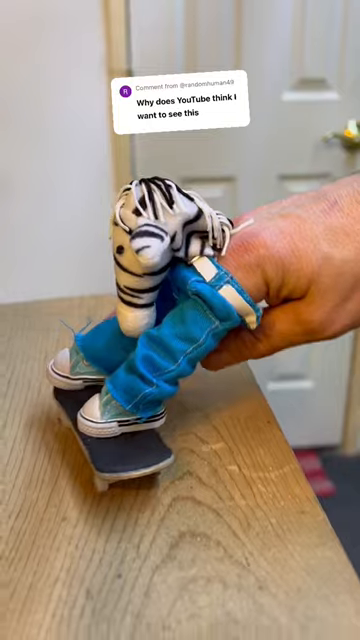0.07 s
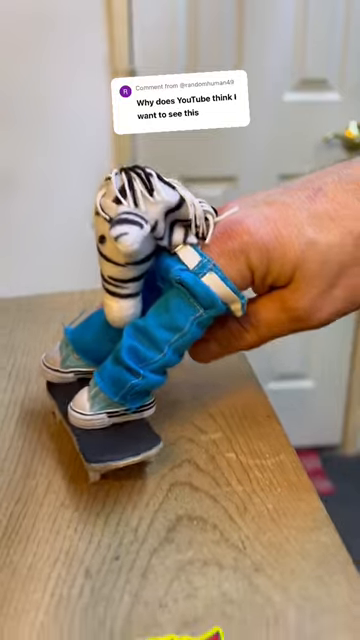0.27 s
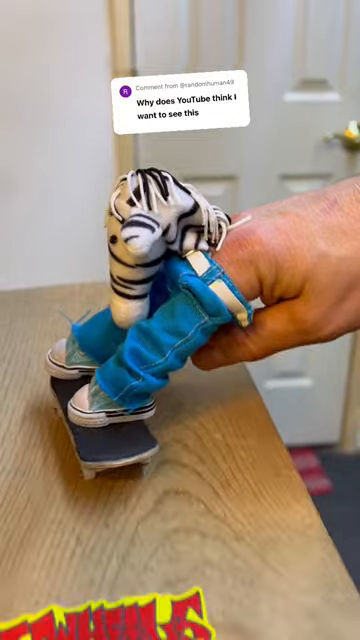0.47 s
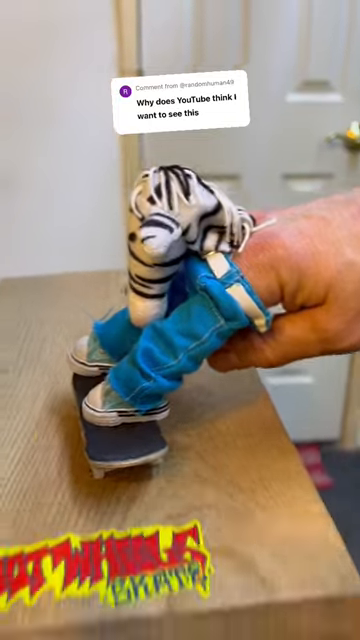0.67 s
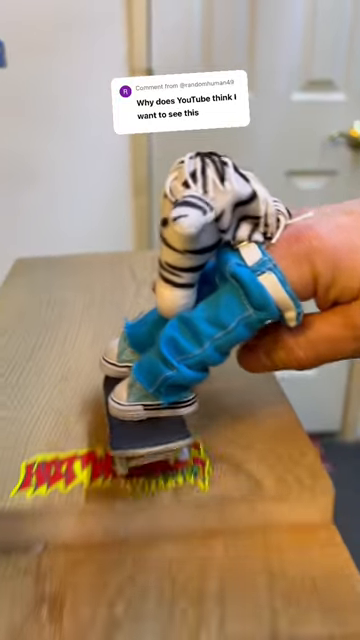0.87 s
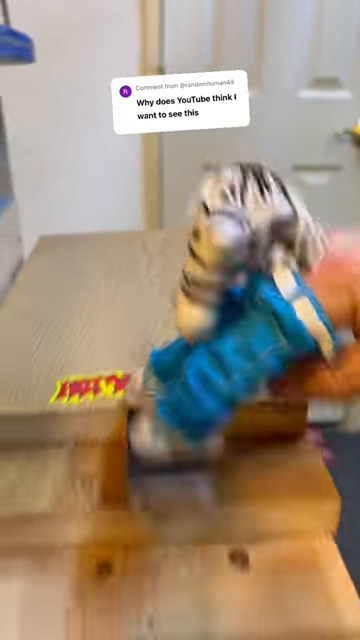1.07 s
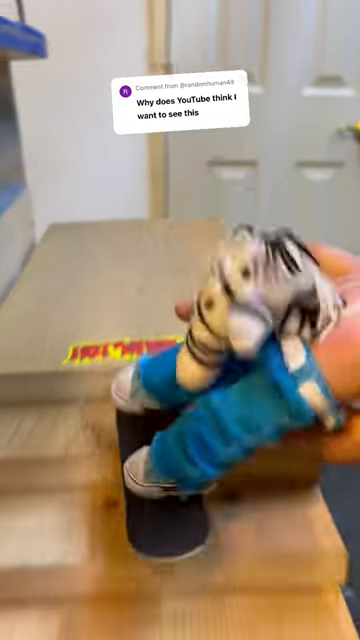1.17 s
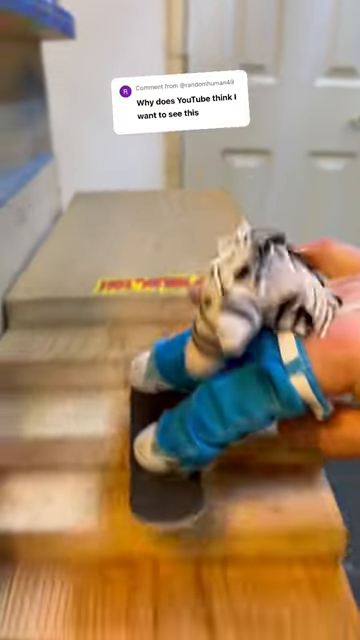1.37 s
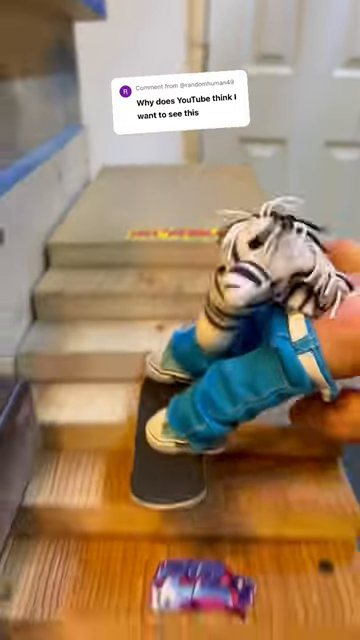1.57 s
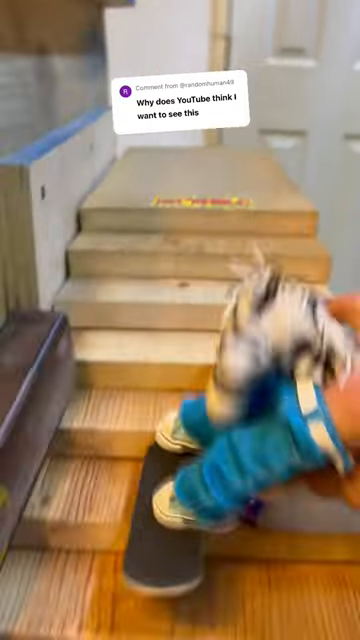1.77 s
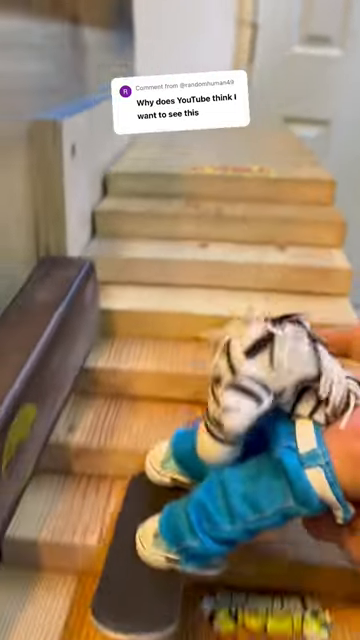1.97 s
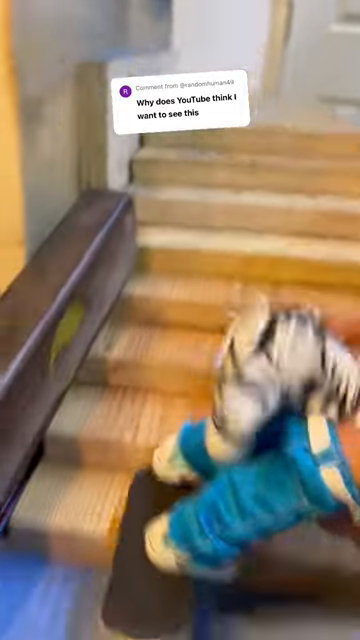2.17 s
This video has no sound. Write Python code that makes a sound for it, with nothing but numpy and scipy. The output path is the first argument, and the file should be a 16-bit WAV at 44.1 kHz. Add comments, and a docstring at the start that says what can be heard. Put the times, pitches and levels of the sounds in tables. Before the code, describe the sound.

A fingerboard rolls across wood with light ticks and a whirr, then clacks quickly down little wooden steps, ending in a low thump. It is heard up close in a small room with a faint fan hum.

```python
"""A fan hums in a small room; a hand bumps softly on a wooden platform and a fingerboard rolls off.
Its wheels tick and start to whirr, then it clacks down a flight of little steps. Each axle lands
with a burst of chatter from wheels and deck; the tread knocks and the whole staircase thumps,
and the bottom board booms last. Heard from close by, through a phone's two microphone ports."""
import sys
import numpy as np
from scipy import signal
from scipy.fft import rfft, irfft
from scipy.io import wavfile
from scipy.ndimage import uniform_filter1d

SR = 44100
rng = np.random.default_rng(int(sys.argv[2]) if len(sys.argv) > 2 else 0)


def unload_wav(signal):
    """Save mono or channel-first audio to the path in sys.argv[1] as 16-bit WAV at rate SR, clipped to [-1, 1]."""
    wavfile.write(
        sys.argv[1],
        SR,
        np.round(np.clip(np.atleast_2d(signal).T, -1, 1) * 32767).astype(np.int16),
    )


N = 98298
T = np.arange(N) / SR
HIT_T = T[:SR // 3]  # time within one impact


def undb(db):
    """Decibels to gain."""
    return 10 ** (np.asarray(db) / 20)


def unit(x):
    """Scale to an rms of one."""
    return x / np.sqrt(np.mean(x ** 2))


def blow(x, db, span_s=0.005):
    """Give a blow the energy of span_s seconds at this level."""
    return x * undb(db) * np.sqrt(span_s * SR / np.sum(x ** 2))


def rise(time_s):
    """Onset of a vibration building up after a blow."""
    return 1 - np.exp(-HIT_T / time_s)


def decay(t60_s):
    """Free decay, 60 dB down after t60_s."""
    return np.exp(-np.log(1000) * HIT_T / t60_s)


def curve(points, hz):
    """Read (freq_hz, value) points on a log axis."""
    freqs, values = np.array(points, float).T
    return np.interp(np.log(hz + 1), np.log(freqs), values)


def colour(x, spectrum, rings_hz=(), ring_db=5.5, ring_width=0.092, size=2048):
    """Minimum-phase filter with the given spectrum and added resonances."""
    hz = np.arange(size // 2 + 1) * SR / size
    peaks_db = sum(ring_db / (1 + ((hz / f - 1) / ring_width) ** 2) for f in rings_hz)
    cepstrum = irfft(np.log(undb(curve(spectrum, hz) + peaks_db)))
    cepstrum[1:size // 2] *= 2
    cepstrum[size // 2 + 1:] = 0
    return signal.fftconvolve(x, irfft(np.exp(rfft(cepstrum))))[:len(x)]


def band(x, low_hz, high_hz):
    """Band-pass."""
    return signal.sosfilt(signal.butter(3, [low_hz, high_hz], "band", fs=SR, output="sos"), x)


def ring(modes, jitter=0.):
    """Damped modes whose signs change with the point of contact; jitter scatters their pitch."""
    chance = rng.standard_normal((len(modes), 2))
    return sum(np.sign(side) * undb(db) * np.sin(2 * np.pi * hz * (1 + jitter * detune) * HIT_T)
               * decay(t60) for (hz, t60, db), (detune, side) in zip(modes, chance))


def add(out, start_s, x):
    """Mix a sound in at its time."""
    i = int(start_s * SR)
    out[i:i + len(x)] += x[:max(N - i, 0)]


# Air from the fan, behind everything: freq_hz, level_db
FAN_SPECTRUM = [(25, -32), (45, -13.5), (70, -10.5), (120, -3.5), (170, 0), (260, -1), (420, 1.5),
                (600, -4), (1000, -18), (2000, -21.5), (4000, -28), (9000, -38), (12000, -45), (16000, -63)]
# Its motor: pitch_hz, level_db
MOTOR_HUM = [(120, -57.5), (240.5, -49)]


def fan(air_db=-42.5, side_db=-14, start_s=0.0348):
    """Steady rush of air with a motor hum, near the centre of the stereo image."""
    spectrum = undb(curve(FAN_SPECTRUM, np.fft.rfftfreq(N, 1 / SR)))
    mid, side = (unit(irfft(rfft(rng.standard_normal(N)) * spectrum, N)) for _ in range(2))
    side *= undb(side_db)
    air = undb(air_db) * np.array([mid + side, mid - side])
    hum = sum(np.sqrt(2) * undb(db) * np.sin(2 * np.pi * hz * T) for hz, db in MOTOR_HUM)
    return (air + hum) * np.clip((T - start_s) / 0.0018, 0, 1)


# Reflections off nearby surfaces: delay_s, level_db
NEAR_ECHOES = [(0.0108, -20.5), (0.019, -26.5)]
# Reverberation of the small room: low_hz, high_hz, t60_s, level_db
ROOM_TAIL = [(100, 820, 0.15, -10), (674, 2020, 0.41, -10), (2420, 6100, 0.33, -15.5),
             (5960, 10200, 0.25, -21.5)]


def room(x, build_s=0.0038):
    """Direct sound, two near reflections and a short diffuse tail that differs at each port."""
    response = np.zeros((2, len(HIT_T)))
    response[:, 0] = 1
    for delay, db in NEAR_ECHOES:
        response[:, int(delay * SR)] += undb(db)
    for low, high, t60, db in ROOM_TAIL:
        noise = rng.standard_normal(len(HIT_T)) + rng.standard_normal(response.shape)
        tail = band(noise, low, high) * (1 - np.exp(-(HIT_T / build_s) ** 2)) * decay(t60)
        response += undb(db) * tail * np.sqrt(4 * (high - low) / SR / np.sum(tail ** 2))
    return signal.fftconvolve(x, response, axes=1)[:, :N]


# Low modes of the staircase frame: pitch_hz, t60_s, level_db
FRAME_MODES = [(64.7, 0.1, -4), (112.5, 0.2, -2.5), (144.4, 0.13, -8.5), (243.3, 0.15, -9)]


def frame_thump(jitter, mode_count=4, rise_s=0.0059):
    """A blow sets the whole frame swinging in its lowest modes."""
    return rise(rise_s) * ring(FRAME_MODES[:mode_count], jitter)


# The hand on the platform: start_s, level_db
HAND_BUMPS = [(0.112,-40), (0.17,-36.5)]
# Wheels scuffing on wood: freq_hz, level_db
SCUFF_SPECTRUM = [(300,-38), (750,12), (1300,7.5), (1700,-1), (2700,-3.5), (5000,-24), (12000,-30)]


def push_off(scuff_at_s=0.246, scuff_width_s=0.018, scuff_db=-41.5, spread_db=5, damping_s=0.037):
    """The hand settles with soft bumps, then the wheels scuff into motion."""
    grains = rng.standard_normal(N) * undb(spread_db * rng.standard_normal(N))
    swell = np.exp(-((T - scuff_at_s) / scuff_width_s) ** 2 / 2)
    out = unit(colour(grains, SCUFF_SPECTRUM)) * undb(scuff_db) * swell
    for start, db in HAND_BUMPS:
        bump = frame_thump(jitter=0.044, mode_count=3) * np.exp(-HIT_T / damping_s)
        add(out, start, blow(bump, db))
    return out


# Loudness along the run: time_s, grit_db, platform_db
ROLL_LEVELS = [(.03,-95,-100), (.195,-85,-76), (.21,-60,-55), (.255,-50,-59), (.291,-61.5,-56),
               (.37,-70,-60), (.52,-56.5,-68), (.6,-49.5,-47), (.67,-57,-55.5), (.8,-49.5,-52),
               (.872,-51.5,-47.5), (.955,-49,-43), (1.,-51,-41.5), (1.06,-37.5,-48), (1.129,-34,-35),
               (1.17,-48,-41), (1.23,-52,-73), (2.22,-48,-58)]
# Grit of the small wheels, close up: freq_hz, level_db
GRIT_SPECTRUM = [(500,-4), (900,1.5), (1500,-6), (2200,-1), (3100,-4.5), (4000,-3.5), (4900,-8.5), (6000,0),
                 (7200,-7.5), (9000,-1.5), (10800,-11.5), (12500,-15), (16000,-23)]
# The wooden platform at the top of the stairs: pitch_hz, t60_s, level_db
PLATFORM_MODES = [(1016,0.051,0), (1085,0.054,-4.5), (1156,0.081,9.5), (1210,0.063,-0.5), (1360,0.032,-3),
                  (1460,.03,-3), (1693,0.034,-7)]


def rolling(grains_per_s=1600, spread_db=3, turn_hz=32, wobble_db=1):
    """Wheels patter over the grain, pulsing once a turn, and make the platform ring."""
    times, grit_db, platform_db = np.array(ROLL_LEVELS).T
    contacts = rng.random(N) < grains_per_s / SR
    grains = contacts * rng.standard_normal(N) * undb(spread_db * rng.standard_normal(N))
    drift = 2 * np.sin(2 * np.pi * 2.28 * T)
    turn = undb(wobble_db * np.sin(2 * np.pi * turn_hz * T + drift))
    grit = unit(colour(grains * turn, GRIT_SPECTRUM))
    platform = signal.fftconvolve(grains, ring(PLATFORM_MODES))[:N]
    local_rms = np.sqrt(uniform_filter1d(platform ** 2, size=2000) + 1e-9)
    platform = unit(turn * platform / local_rms)
    return grit * undb(np.interp(T, times, grit_db)) + platform * undb(np.interp(T, times, platform_db))


def chatter(length_s, attack_s=0.00084, rattle_db=-21.5, rattle_s=0.018, spread_db=4):
    """A tight burst of tiny contacts, then a faint, gritty rattle of the trucks."""
    fall = np.exp(-np.maximum(HIT_T - 0.44 * length_s, 0) / (0.76 * length_s))
    burst = np.minimum(HIT_T / attack_s, 1) * fall
    flicker = unit(uniform_filter1d(rng.standard_normal(len(HIT_T)), size=40))
    rattle = undb(rattle_db) * unit(undb(spread_db * flicker)) * np.exp(-HIT_T / rattle_s)
    return rng.standard_normal(len(HIT_T)) * (burst + rattle)


# Light ticks of wheels and loose trucks: start_s, click_db, platform_db
WHEEL_TICKS = [(0.207,-43,-45), (.237,-53,-55), (.261,-43,-49), (0.283,-54,-61), (.307,-50.5,-53),
               (.321,-57,-53), (.349,-55,-60), (.397,-48,-61), (.429,-52,-62), (.469,-48,-58),
               (.479,-47.5,-58), (0.501,-58,-61), (0.534,-50,-58), (0.547,-44,-49), (.563,-60,-56),
               (.585,-49,-42.5), (.613,-43,-47), (0.638,-51,-55), (0.681,-57,-60), (0.725,-47,-42),
               (0.772,-51.5,-52), (.788,-46,-54), (0.805,-44.5,-46), (0.88,-47,-45), (.929,-42,-42),
               (0.95,-36.5,-50), (1.062,-32,-43), (1.216,-34,-54), (1.2253,-36.5,-51), (1.2612,-26.5,-42),
               (1.596,-32,-45), (1.6343,-32,-33), (2.019,-56,-59)]


def ticks(length_s=0.0018):
    """Loose wheels click against their axles and knock on the platform."""
    out = np.zeros(N)
    for start, click_db, platform_db in WHEEL_TICKS:
        click = band(colour(chatter(length_s), GRIT_SPECTRUM), 2400, 19000)
        add(out, start, blow(click, click_db))
        add(out, start, blow(ring(PLATFORM_MODES, jitter=0.019), platform_db))
    return out


# A wheel's judders around the top step: start_s, length_s, pitch_hz, level_db, roughness (0-1)
WHEEL_JUDDERS = [(0.782,0.0076,1138,-36,0.54), (.808,0.01,1150,-40,0.7), (.84,.008,1165,-47,0.4),
                 (0.865,0.014,1150,-38,0.5), (0.89,0.0055,1123,-35.5,0), (0.92,0.013,1173,-29,0.44),
                 (.954,0.0077,1108,-25,0.52), (0.984,0.014,1150,-32,0.33), (1.012,0.0096,1172,-29,.6),
                 (1.041,0.0083,1176,-25.5,0.54), (1.102,0.0048,1055,-12,0.25), (1.117,0.0095,1140,-16,0.2),
                 (1.143,0.0092,1172,-25,.4), (1.16,.009,1133,-36,0.5), (1.185,0.0088,1000,-53,.7)]


def whirr(rise_s=0.0017, fall_s=0.0027, edge_ratio=1.11, overtone_ratio=1.39, overtone_db=-22):
    """A wheel judders on its axle once a turn: a short rough burst with a weaker overtone."""
    out = np.zeros(N)
    for start, length, hz, db, rough in WHEEL_JUDDERS:
        swell = np.minimum(HIT_T / rise_s, 1) * np.exp(-np.maximum(HIT_T - length, 0) / fall_s)
        rasp, overtone = (unit(band(rng.standard_normal(len(HIT_T)), f / edge_ratio, f * edge_ratio))
                          for f in (hz, hz * overtone_ratio))
        tone = unit(np.sin(2 * np.pi * hz * HIT_T))
        judder = (1 - rough) * tone + rough * rasp + undb(overtone_db) * overtone
        add(out, start, blow(swell * judder, db))
    return out


# Wheels rattling in the air: time_s, pitch_hz, level_db
SPIN_GLIDE = [(1.105,2350,-40), (1.14,2140,-44.5), (1.201,1985,-47), (1.225,1830,-71)]


def free_spin(width_hz=260, flutter_hz=55, flutter_db=3):
    """Off the top step the wheels spin in the air; their rattle sinks as they slow."""
    times, hz, db = np.array(SPIN_GLIDE).T
    roughness = unit(band(rng.standard_normal(N), 8.5, width_hz / 2))
    tone = np.sin(2 * np.pi * np.cumsum(np.interp(T, times, hz)) / SR)
    level_db = np.interp(T, times, db, left=-120, right=-120)
    flutter = flutter_db * np.sin(2 * np.pi * flutter_hz * T)
    return unit(roughness * tone) * undb(level_db + flutter)


# The board at the foot of the stairs: pitch_hz, t60_s, level_db
BOTTOM_BOARD_MODES = [(111.4,0.2,-15), (282,0.059,1)]


def boom(start_s=2.147, rise_s=0.0076, level_db=-21.5):
    """The full weight comes down on the bottom board, which gives a low wooden boom."""
    out = np.zeros(N)
    swell = 1 - np.exp(-(HIT_T / rise_s) ** 2)
    add(out, start_s, blow(swell * ring(BOTTOM_BOARD_MODES), level_db))
    return out


def part_ring(pitches_hz, t60_s, step_db=-8):
    """Deck or wheel rings clear, each further mode a step weaker."""
    return ring([(hz, t60_s, k * step_db) for k, hz in enumerate(pitches_hz)])


# The fingerboard's clack, close up: freq_hz, level_db
CLACK_SPECTRUM = [(1200, 1.5), (2000, 0), (3000, -4.5), (3800, -3), (4900, -6.5), (6300, -3.5),
                  (7200, -2.5), (8400, 0), (10000, -1), (12500, -5.5), (16000, -2)]
# The wood of the staircase: pitch_hz, t60_s, level_db
STAIR_MODES = [(313,0.076,-9), (421,0.047,-2), (489,0.066,-1.5), (534,0.051,-3), (660,0.036,-11),
               (706,0.036,2.5), (820,0.043,-5), (968,0.079,-4.5), (1036,0.038,3)]
# Axles landing on the steps: start_s, chatter_s, deck_hz (three, strongest first),
# wheel_hz (two, likewise), deck_db, crack_db, tick_db, tread_hz, tread_db,
# overtone_db (relative to the tread), stairs_db, thump_db
AXLE_LANDINGS = [(1.0688,0.0019,(3340,2520,1590),(6700,8200),-16.5,-12,-19,1197,-27,-23,-27.5,-39),
                 (1.101,0.0016,(1840,2930,3800),(6040,7300),-24.5,-14.5,-17.5,1047,-20,-7,-19.5,-24),
                 (1.27,0.0016,(1840,3900,2600),(6510,5120),-21,-21,-16,1000,-29,-8,-23,-26.5),
                 (1.281,0.00085,(1300,1300,3700),(5000,4200),-41,-36,-29,400,-25,-12,-33,-43),
                 (1.291,0.0009,(1340,2260,3450),(5000,6000),-30.5,-22,-26.5,473,-30.5,-19,-23,-28),
                 (1.462,0.0046,(3430,2710,1410),(9520,7040),-25,-16.5,-16.5,463,-33,-12,-26,-32.5),
                 (1.4868,0.0018,(1770,2900,3330),(7200,8700),-20.5,-18.5,-18.5,864,-27.5,-5,-25,-27.5),
                 (1.6061,0.0019,(3270,3250,2000),(8140,6500),-21.5,-17,-14.5,820,-26.5,-12,-31,-28),
                 (1.6391,0.0018,(2280,3000,4650),(8000,8100),-19.5,-20,-18,536,-18,-29,-23,-36),
                 (1.7357,0.0038,(3400,2200,2000),(7000,8900),-28,-18.5,-22,590,-22,-22,-45,-41),
                 (1.741,0.00055,(4300,3500,2200),(8310,9000),-27,-21.5,-20,585,-15.5,-31,-28,-42),
                 (1.7772,0.002,(2750,3370,4000),(5600,7300),-17.5,-14.5,-17.5,561,-18.5,9,-21.5,-27),
                 (1.8972,.0019,(3500,2470,2240),(8200,5900),-23,-17,-17.5,775,-21.5,-24,-29.5,-29),
                 (1.902,0.0014,(3990,3100,4300),(8500,7300),-24.5,-17,-16.5,534,-16.5,-6,-32,-57),
                 (1.9405,0.0014,(1460,2060,3300),(8400,6070),-23,-19,-18,538,-28,-15,-25.5,-29),
                 (2.0897,0.0032,(2820,3650,1800),(6600,5400),-26,-17,-16,628,-23.5,-10,-44,-30),
                 (2.095,0.00089,(2770,2900,4500),(6400,8500),-27.5,-20,-19,853,-28.5,-17,-31.5,-47),
                 (2.1376,0.0026,(3500,2600,4000),(7940,4400),-17,-14.5,-17.5,466,-27.5,0,-23,-29)]


def landings(tread_t60_s=0.077, overtone_ratio=1.56, push_s=0.0013, spread_s=0.0041, apart=0.27):
    """Each axle cracks on a step; tread, deck, wheels, staircase and frame ring after it."""
    out = np.zeros((2, N))
    push = rise(push_s)
    for (start, chatter_s, deck_hz, wheel_hz, deck_db, crack_db, tick_db,
         tread_hz, tread_db, overtone_db, stairs_db, thump_db) in AXLE_LANDINGS:
        tread_modes = [(tread_hz, tread_t60_s, 0), (tread_hz * overtone_ratio, tread_t60_s, overtone_db)]
        tread = blow(push * ring(tread_modes), tread_db - 1.5)
        deck = blow(push * part_ring(deck_hz, t60_s=0.012), (deck_db + crack_db) / 2 - 5)
        wheels = blow(push * part_ring(wheel_hz, t60_s=0.007), tick_db - 5)
        # The blow takes a moment to spread through the staircase.
        stairs = blow(rise(spread_s) * ring(STAIR_MODES, jitter=0.043), stairs_db + 1)
        thump = blow(frame_thump(jitter=0.033), thump_db - 3)
        knock = tread + deck + wheels + stairs + thump
        bands = ((1153, 2660, deck_db), (2650, 5300, crack_db), (4970, 11930, tick_db))
        contact = chatter(chatter_s)
        for port in out:
            at_port = contact + apart * chatter(chatter_s)  # a share differs between the ports
            board = colour(at_port, CLACK_SPECTRUM, (*deck_hz, *wheel_hz))
            clack = sum(blow(band(board, low, high), db) for low, high, db in bands)
            add(port, start, clack + knock)
    return out


def scene():
    """The fingerboard on the stairs, close by in the small room, over the fan."""
    run = landings() + boom() + ticks() + rolling() + whirr() + free_spin() + push_off()
    return room(run) + fan()


# Phase between the phone's microphone ports: freq_hz, left_lead_rad
MIC_PHASE = [(100,0), (380,-0.5), (690,-1.2), (1000,0.98), (1330,0.88), (2100,0.48), (2550,1.5),
             (2850,2.07), (3030,1.25), (3270,3.5), (3420,5), (3600,5), (3850,5.5), (4080,5.5), (4450,4),
             (4900,4.5), (5450,0.24), (6800,0.1), (8000,-0.7), (10400,-1.66), (12600,-3), (16000,-3.5)]
# Balance between them: freq_hz, left_minus_right_db
MIC_BALANCE = [(100, 0), (380, 1), (700, -5.5), (1290, -3.5), (2380, -1), (4400, 0)]


def record(dry, ceiling=1.2, top_hz=16300):
    """The phone's two ports differ in phase and level; it rounds the peaks and cuts the top."""
    hz = np.fft.rfftfreq(2 * N, 1 / SR)
    tilt = undb(curve(MIC_BALANCE, hz) / 2)
    ports = np.array([tilt, np.exp(-1j * curve(MIC_PHASE, hz)) / tilt])
    heard = irfft(rfft(dry, 2 * N) * ports)[:, :N]
    rounded = ceiling * np.tanh(heard / ceiling)
    return signal.sosfilt(signal.ellip(8, .2, 80, top_hz, fs=SR, output="sos"), rounded)


dry = scene()
out = record(dry)
unload_wav(out)
```